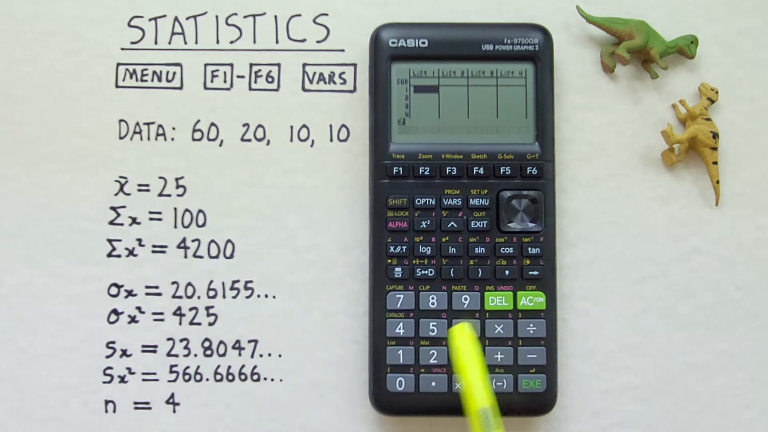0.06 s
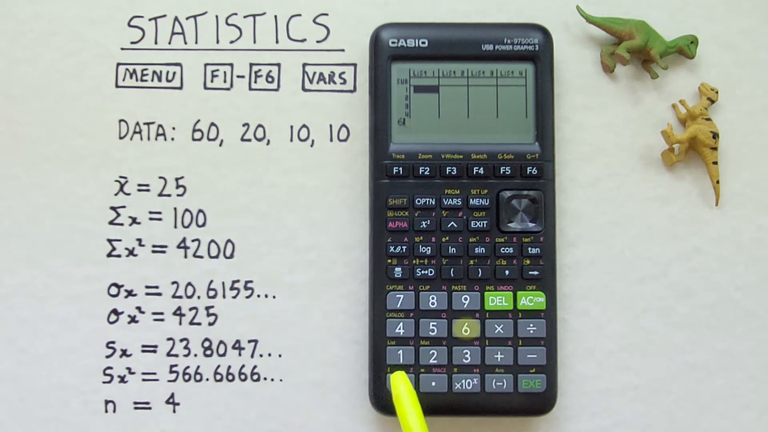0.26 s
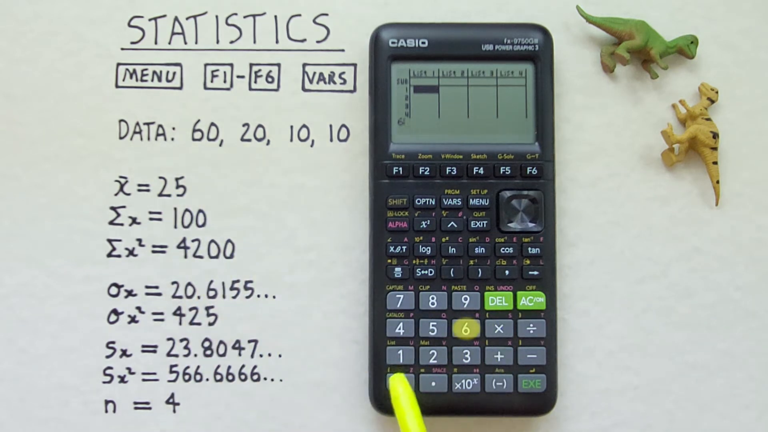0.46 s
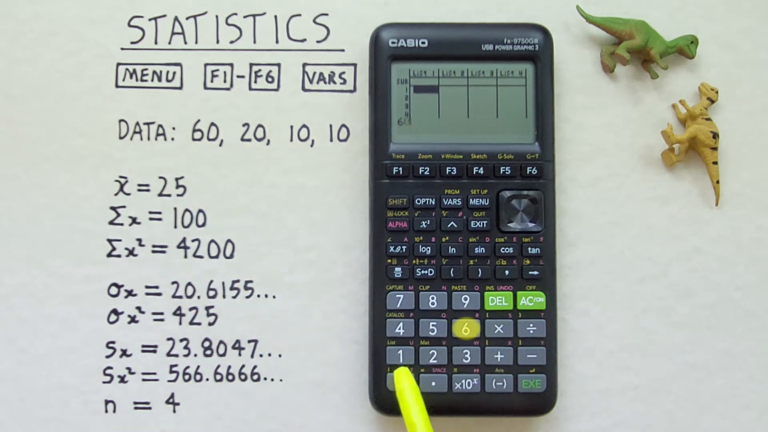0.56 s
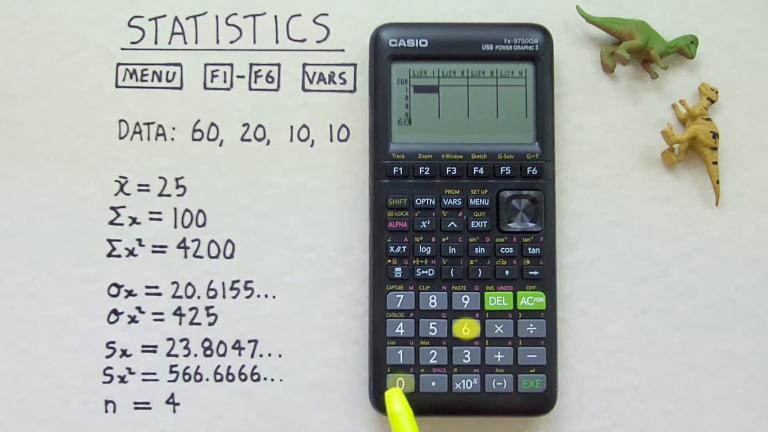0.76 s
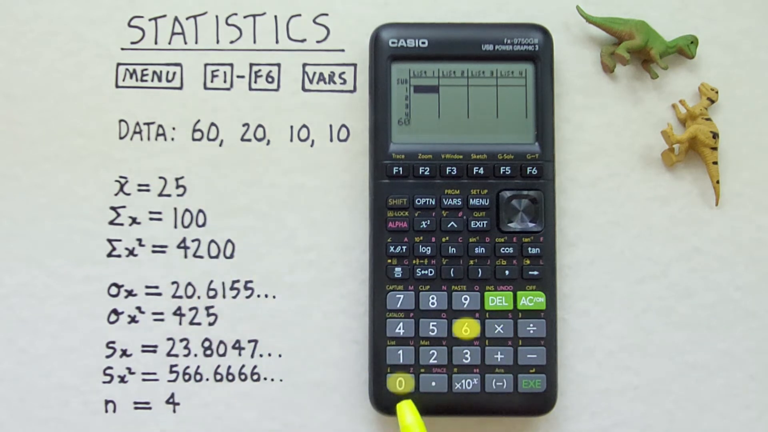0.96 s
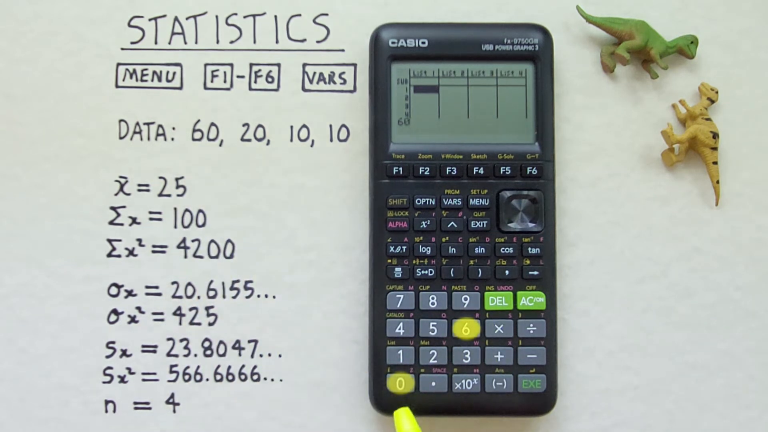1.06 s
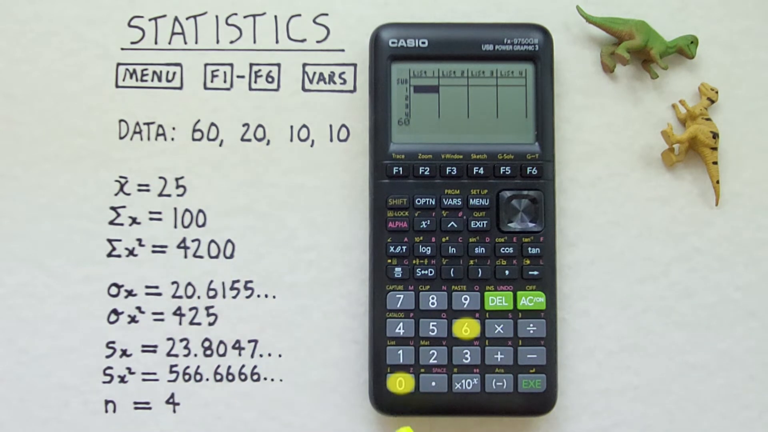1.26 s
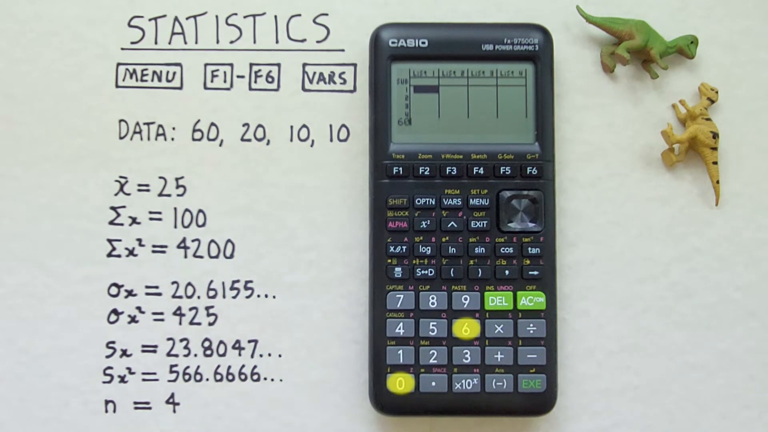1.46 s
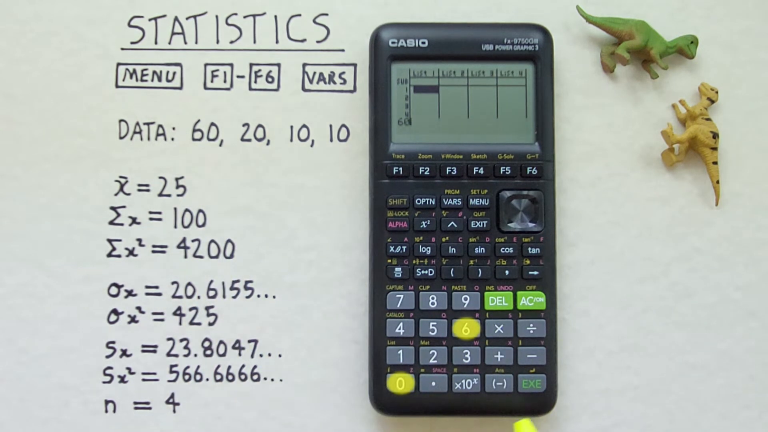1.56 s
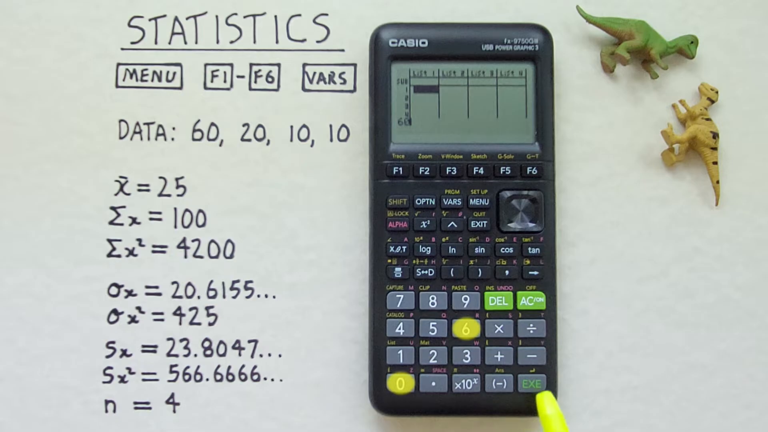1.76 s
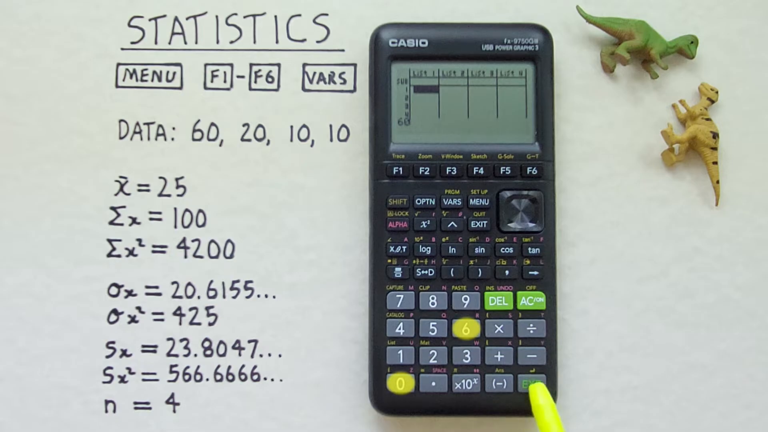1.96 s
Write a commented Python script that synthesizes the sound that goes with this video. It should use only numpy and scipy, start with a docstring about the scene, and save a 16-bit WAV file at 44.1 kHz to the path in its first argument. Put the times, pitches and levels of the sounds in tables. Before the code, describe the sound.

Close by, a pen presses plastic calculator keys, giving small gritty clicks and boomy low desk thumps, strongest just after half a second; afterwards a quiet indoor room with motor hum, rumble and light microphone hiss.

```python
"""Calculator keys on a light desk

A pen taps and presses the keys of a pocket calculator lying on a light desk that also carries the microphone.
Each push and let-go excites decaying desk modes that beat slowly; damped sines make the case knocks.
Impulses and noise bursts through a bank of resonances make the key clicks, which a small room answers.
A fan motor hums as a sum of shaft orders, over room air, rumble and microphone hiss of shaped noise."""
import sys
import numpy as np
from scipy import signal
from scipy.fft import rfft, irfft, next_fast_len
from scipy.io import wavfile
from scipy.ndimage import map_coordinates

SR = 44100
rng = np.random.default_rng(int(sys.argv[2]) if len(sys.argv) > 2 else 0)


def nominal_scale(level):
    """Amplitude ratio for a level in decibels (scalar or array-like)."""
    x = np.asarray(level, float) / 20
    return 10 ** x


def to_wav(s):
    """Save 16-bit WAV."""
    ch = np.atleast_2d(s).T  # columns
    pcm = np.round(np.clip(ch, -1, 1) * 32767)  # PCM
    wavfile.write(sys.argv[1], SR, pcm.astype(np.int16))


N = 88244
T = np.arange(N) / SR

# Desk top modes: pitch_hz, t60_s, push_db, push_sign, let_go_db, let_go_sign
DESK_MODES = [(50.2, 0.916, -22.1, 1, -20.6, -1), (53.29, 1.0, -63.5, 1, -17.5, 1),
              (55.92, 0.404, -9.0, -1, 0.0, -1), (63.15, 0.5, 0.0, 1, -7.0, 1),
              (65.8, 0.194, -7.5, -1, -2.7, 1)]
DESK_SWELL_S = 0.0094
# Pen loading the desk: start_s, level_db, direction (sign)
PUSHES = [(-0.0269, -41.3, -1), (0.0612, -37.8, -1), (0.4792, -40.4, 1), (0.6152, -26.7, 1)]
# Pen unloading the desk: start_s, level_db, direction (sign)
LET_GOS = [(0.1258, -26.6, 1), (0.7172, -26.2, 1)]

# Knock modes of case and desk: pitch_hz, relative_level_db, t60_s
KNOCK_MODES = [(133.2, 0.5, 0.29), (172.2, -13.5, 0.071), (207.4, 3.5, 0.1), (254, -9.5, 0.15),
               (303, -13.5, 0.043), (365.4, -5.5, 0.2), (440.7, -8, .3), (455, -8, 0.095),
               (550, -25.5, 0.12)]
# Knocks: start_s, level_db, dullness_db_per_octave (negative is duller)
KNOCKS = [(0, -56, -24), (0.127, -53, -17.5), (0.476, -62, -0.5), (0.615, -45.5, -5), (0.643, -68, 5.5),
          (.735, -54.5, -8.5)]

# Key and case resonances: pitch_hz, width_hz, relative_level_db
KEY_MODES = [(800, 700, -22.5), (1077, 324, 5.5), (1260, 198, 7), (1430, 120, 1), (1870, 670, -8.5),
             (2550, 300, -4), (2870, 460, -11.5), (3470, 770, -14), (4600, 1300, -18.5), (6300, 1160, -23),
             (7900, 1300, -22.5), (10240, 2100, -29), (13000, 2900, -36)]
FAVOUR_DB, FAVOUR_OCTAVES = 6, 0.2  # boost of modes near the favoured pitch, and its reach
SKIRT = 1.3  # each mode fades faster above SKIRT times its pitch
# Single clean contacts: start_s, peak_db (before variation), brightness_db_per_octave, favoured_hz
TAPS = [(0.1185, -64, -1.5, 1120), (0.1203, -56.5, 1, 1100), (0.1228, -48, -17, 1100),
        (.129, -54, -9, 1090), (.1355, -60.5, 2, 1100), (0.4771, -54, 3, 2770), (0.479, -58.5, -1, 1260),
        (0.5828, -64, 1.5, 1430), (0.6162, -52, 6, 2550), (0.644, -60, -1, 990), (0.7154, -66, 0, 2800),
        (.719, -63, -5, 1260)]
TAP_VARY_DB = 2
# Gritty rattles and scrapes: start_s, relative_strength_db, spread_ms, brightness_db_per_octave, favoured_hz
RATTLES = [(0, -55, 6.7, 3, 1050), (0.121, -61.5, 8, 2, 7900), (.477, -59, 3.5, -1, 7050),
           (.586, -66, 13.5, 2.5, 1630), (.613, -56, 3.5, 6.5, 1260), (0.618, -62, 11, 5, 6300),
           (0.696, -65.5, 5.5, 0, 1370), (.712, -61, 4.5, 6.5, 1870), (.727, -64.5, 12, -4, 2180),
           (1.631, -71.5, 3.5, 11.5, 13000)]
GRIT_DB = 3.5  # random spread of the contact strengths
RISE_SHARE = 0.46  # rise time as a share of the spread

# Decay of the room: pitch_hz, t60_s
ROOM_DECAY = [(200, 0.67), (1200, 0.39), (3000, 0.24), (10000, 0.28)]
ROOM_KEYS_DB, ROOM_KNOCKS_DB = -7, -11  # sends into the room

# Fan motor: time_s, shaft_hz, hum_level_db
FAN = [(0, 39.1, -68.5), (.7, 38.71, -64.5), (0.901, 38.65, -71), (1.27, 38.3, -66.5), (1.35, 38.43, -69),
       (1.42, 39.47, -66.5), (1.6, 38.82, -66), (2, 40.15, -65.5)]
# Shaft orders: multiple (of shaft_hz), relative_level_db
ORDERS = [(2, -10), (3, -17), (4, -21.5), (5, -0.5), (6, -21.5), (7, -11.5), (8, -19), (11, -22.5),
          (15, -20.5)]
WAVER_DB, WAVER_PER_S = 1.4, 8.17

# Spectrum of the room air: pitch_hz, relative_density_db (per Hz)
AIR = [(60, -120), (85, -1), (120, 0.5), (150, -1.5), (200, -2), (270, -1), (350, -7.5), (440, -3),
       (530, -11.5), (600, -9.5), (800, -14), (1150, -15), (1450, -16.5), (1800, -22), (3000, -28),
       (4000, -40.5), (6000, -120)]
AIR_DB = -74.0
# Spectrum of the room's rumble: pitch_hz, relative_density_db (per Hz)
RUMBLE = [(8, -120), (12, -0.5), (20, 0), (30, -2), (42, -14), (58, -7.5), (72, -17), (82, -14.5),
          (100, -38), (150, -120)]
# Level of the rumble: time_s, level_db
RUMBLE_LEVEL = [(0, -55.5), (.4, -61), (.7, -61), (1.05, -55), (1.25, -59), (1.35, -65.5), (1.5, -65.5),
                (1.65, -59), (1.8, -66.5), (2, -50.5)]
# Spectrum of the microphone hiss: pitch_hz, relative_density_db (per Hz)
HISS = [(900, -33), (1500, -2), (2500, -2), (4500, -2), (8000, -4), (12000, -4), (15000, -5), (16500, -3.5)]
HISS_DB = -82


def unit(x):
    """Normalisation: scale a signal to rms 1."""
    return x / np.sqrt(np.mean(x ** 2) + 1e-20)


def along(points, hz):
    """Interpolation of (pitch_hz, value) points on a logarithmic frequency axis."""
    pitch_hz, value = np.transpose(points)
    return np.interp(np.log(hz + 1), np.log(pitch_hz + 1), value)


def wobble(rate):
    """Slow random modulation: a smooth curve through rate random knots a second."""
    knots = rng.standard_normal(200)
    return map_coordinates(knots, [np.clip(T * rate, 0, 199)])


def filtered(x, response):
    """Linear filtering: multiply the spectrum of x by a complex frequency response."""
    size = next_fast_len(len(x) + 8192)
    hz = np.fft.rfftfreq(size, 1 / SR)
    return irfft(rfft(x, size) * response(hz), size)[:len(x)]


def noise(spectrum, db, swing_db, rate):
    """Spectral shaping: coloured noise whose level drifts randomly."""
    coloured = filtered(rng.standard_normal(N), lambda hz: nominal_scale(along(spectrum, hz)))
    return nominal_scale(db + swing_db * wobble(rate)) * unit(coloured)


def desk():
    """Modal beating: close low modes of either sign swell, beat and cancel after each load change."""
    out = np.zeros(N)
    for events, column in ((PUSHES, 2), (LET_GOS, 4)):
        for start_s, db, direction in events:
            since = np.maximum(T - start_s, 0)
            ring = np.zeros(N)
            for mode in DESK_MODES:
                hz, t60 = mode[:2]
                mode_db, sign = mode[column:column + 2]
                decay = nominal_scale(mode_db - 60 * since / t60)
                ring += np.sign(sign) * decay * np.sin(2 * np.pi * hz * since)
            swell = 1 - np.exp(-since / DESK_SWELL_S)
            out += np.sign(direction) * nominal_scale(db) * ring * swell
    return out


def knocks():
    """Modal impact: the case thumps on the desk as damped sines; soft contacts leave out the upper modes."""
    out = np.zeros(N)
    variations = rng.standard_normal((len(KNOCKS), len(KNOCK_MODES)))  # dB
    for (start_s, db, dull_db), draw in zip(KNOCKS, variations):
        since = np.maximum(T - start_s, 0)
        onset = 1 - np.exp(-since / 0.001)
        for (hz, level_db, t60), vary_db in zip(KNOCK_MODES, draw):
            colour_db = dull_db * np.log2(hz / KNOCK_MODES[0][0])
            gain = nominal_scale(db + level_db + vary_db + colour_db - 60 * since / t60)
            out -= gain * np.sin(2 * np.pi * hz * since) * onset
    return out


def key(force, bright_db, favoured_hz):
    """Resonant filtering: hard contacts are brighter and the spot touched favours some modes."""
    def response(f):
        total = 0
        for k, (hz, width, level_db) in enumerate(KEY_MODES):
            distance = np.log2(hz / favoured_hz) / FAVOUR_OCTAVES
            colour_db = bright_db * np.log2(hz / 1200) + FAVOUR_DB * np.exp(-distance ** 2)
            resonance = 1j * f * width / (hz * hz - f * f + 1j * f * width)
            skirt = 1 / (1 + 1j * f / (SKIRT * hz))
            total = total + (-1) ** k * nominal_scale(level_db + colour_db) * resonance * skirt
        return total
    return filtered(force, response)


def clicks():
    """Impulsive excitation: taps are single blows, rattles are bursts of tiny random contacts."""
    out = np.zeros(N + SR)
    t = np.arange(SR // 4) / SR
    for (start_s, db, bright_db, hz), vary in zip(TAPS, rng.standard_normal(len(TAPS))):
        tap = key(1.0 * (t == 0), bright_db, hz)
        tap /= np.abs(tap).max()
        out[round(start_s * SR):][:len(t)] += nominal_scale(db + TAP_VARY_DB * vary) * tap

    draws = rng.standard_normal((len(RATTLES), 2, len(t)))
    for (start_s, db, spread_ms, bright_db, hz), (contacts, grit) in zip(RATTLES, draws):
        u = t * 1000 / spread_ms
        envelope = np.exp(-u) * (1 - np.exp(-u / RISE_SHARE))
        rattle = key(contacts * nominal_scale(GRIT_DB * grit) * envelope, bright_db, hz)
        # energy grows with the spread
        scale = np.sqrt(spread_ms / 1000 * SR / len(t)) / 2
        out[max(round(start_s * SR), 0):][:len(t)] += nominal_scale(db) * unit(rattle) * scale
    return out[:N]


def room(x):
    """Reverberation: convolution with a noise tail in which each frequency dies at its own speed."""
    hz, t, z = signal.stft(rng.standard_normal(SR // 2), SR, nperseg=256)
    decay = nominal_scale(-60 * t / along(ROOM_DECAY, hz)[:, None])
    tail = signal.istft(z * decay, SR, nperseg=256)[1]
    delayed = np.pad(x, (250, 0))  # samples
    return signal.fftconvolve(delayed, tail / np.linalg.norm(tail))[:N]


def fan():
    """Harmonic synthesis: multiples of the shaft rate, each wavering in level on its own."""
    time_s, shaft_hz, hum_db = np.transpose(FAN)
    turn = 2 * np.pi * np.cumsum(np.interp(T, time_s, shaft_hz)) / SR
    lines = np.zeros(N)
    for multiple, level_db in ORDERS:
        level = nominal_scale(level_db + WAVER_DB * wobble(WAVER_PER_S))
        lines += level * np.sin(round(multiple) * turn + rng.uniform(0, 2 * np.pi))
    return np.sqrt(2) * nominal_scale(np.interp(T, time_s, hum_db)) * lines


def room_air():
    """Background noise: shaped air noise plus low rumble of changing level."""
    rumble_db = np.interp(T, *np.transpose(RUMBLE_LEVEL))
    return noise(AIR, AIR_DB, 0.44, 4.6) + noise(RUMBLE, rumble_db, 3.4, 12)


def scene():
    """Superposition: desk, keys and case, their room answer, fan and room air add linearly."""
    keys, case = clicks(), knocks()
    answer = room(nominal_scale(ROOM_KEYS_DB) * keys + nominal_scale(ROOM_KNOCKS_DB) * case)
    mix = desk() + keys + case + answer + fan() + room_air()
    return mix[None]


def band_limit(x):
    """A steep low-pass at the top of the band."""
    return signal.sosfilt(signal.butter(12, 15700, fs=SR, output="sos"), x)


def record(dry):
    """Additive sensor noise: the microphone adds its shaped hiss to the scene."""
    finished = dry + noise(HISS, HISS_DB, 0.1, 5)
    return band_limit(finished)


dry = scene()
out = record(dry)
to_wav(out)
```